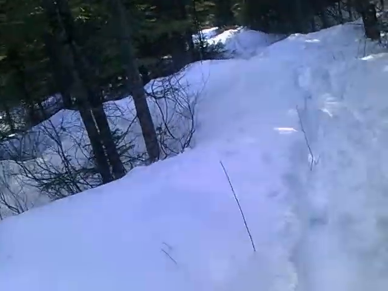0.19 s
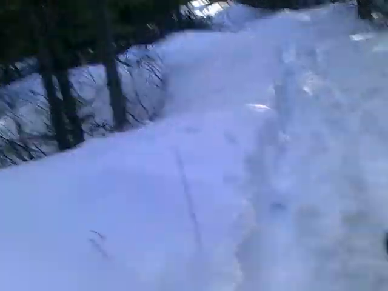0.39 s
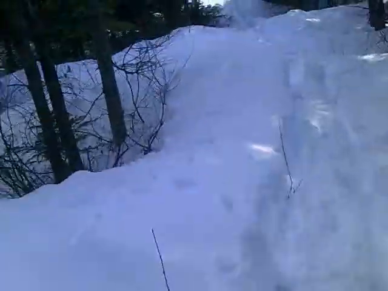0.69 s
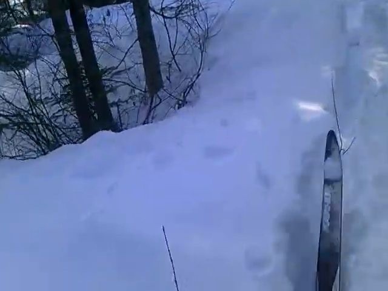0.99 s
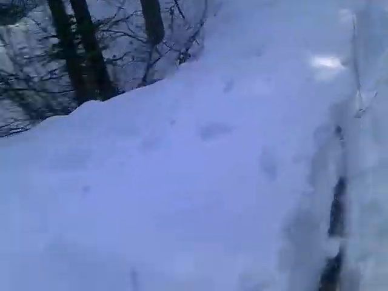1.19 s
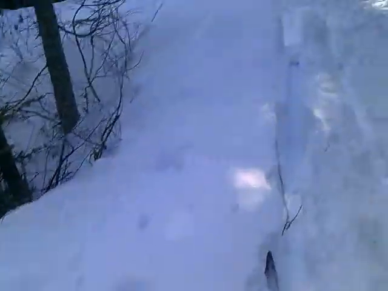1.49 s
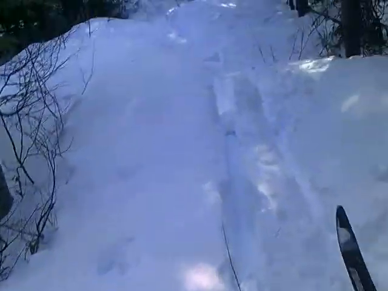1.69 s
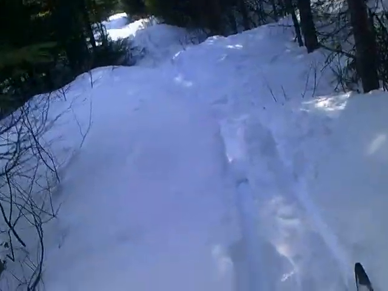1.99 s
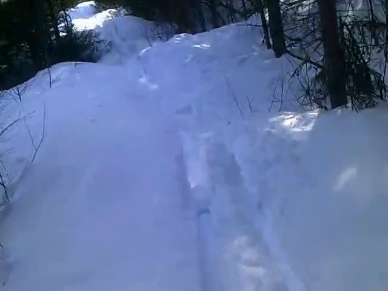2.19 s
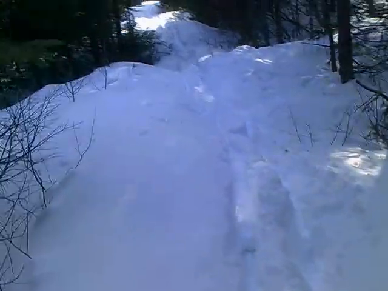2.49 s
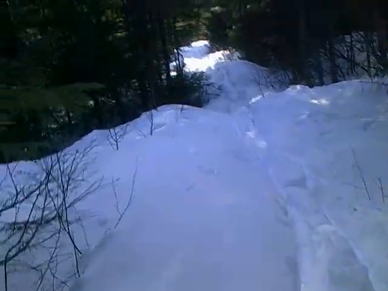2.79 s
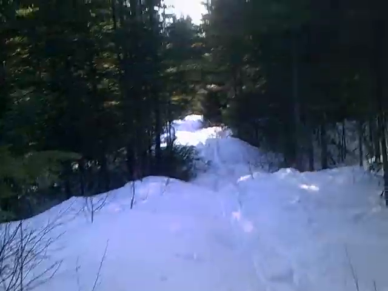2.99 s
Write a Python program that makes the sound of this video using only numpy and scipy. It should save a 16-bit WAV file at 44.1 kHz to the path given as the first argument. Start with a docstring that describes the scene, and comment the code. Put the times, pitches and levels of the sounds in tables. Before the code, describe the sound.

Skis hiss and crunch through soft snow while gear knocks sharply against the microphone.

```python
"""A cross-country trail in soft snow, heard from a small camera on the skier's body.
Skis hiss and snow crunches under skis and poles; gear knocks and rubs on the camera's plastic case.
The strides buffet its dull microphone, which overloads on the hardest knocks."""
import sys
import numpy as np
from scipy import signal
from scipy.fft import rfft, irfft
from scipy.io import wavfile
from scipy.ndimage import uniform_filter1d

SR = 44100
rng = np.random.default_rng(int(sys.argv[2]) if len(sys.argv) > 2 else 0)


def generate_wav(sig):
    """Save sig (samples, or channels by samples) to the path in sys.argv[1] as 16-bit PCM at SR."""
    pcm = np.round(np.clip(np.atleast_2d(sig).T, -1, 1) * 32767).astype(np.int16)
    wavfile.write(sys.argv[1], SR, pcm)


N = 136710

# air and body movement on the microphone: time_s, level_db
BUFFET_LEVELS = [(0, -31), (.15, -41), (.21, -27), (.26, -40.5), (.32, -23.5), (.58, -24), (.66, -43),
                 (.75, -30), (.87, -35.5), (.96, -28), (1.1, -29.5), (1.2, -17.5), (1.5, -35), (1.75, -37),
                 (1.84, -31.5), (1.95, -34), (2.15, -21), (2.32, -26), (2.62, -31), (2.8, -27.5),
                 (3.1, -39.5)]
# buffeting rumble: freq_hz, gain_db
BUFFET_SPECTRUM = [(3, -13.5), (9, 3.5), (18, -7), (80, -22.5), (150, -29), (700, -53), (3000, -84)]
# body bumping the camera: start_s, level_db, pitch_hz
BODY_BUMPS = [(0.303, -19.5, 130), (0.318, -13.5, 170), (0.395, -17, 110), (1.165, -16.5, 173),
              (1.206, -16, 70), (1.22, -19.5, 120), (1.259, -16.5, 140), (1.342, -23.5, 134)]
# hiss of the gliding skis: time_s, level_db
GLIDE_LEVELS = [(0, -42.5), (.13, -43), (.22, -42), (.35, -32.5), (.57, -36), (.63, -47.5), (.68, -44),
                (.73, -38.5), (.9, -40), (1.0, -37.5), (1.26, -37), (1.315, -42.5), (1.38, -37),
                (1.58, -40), (1.79, -39.5), (1.84, -38), (2.08, -41), (2.16, -37.5), (2.34, -40),
                (2.42, -38.5), (2.58, -35), (2.66, -38), (2.74, -36), (2.81, -26.5), (2.87, -35),
                (2.94, -32), (3.1, -39)]
# ski sliding on snow: freq_hz, gain_db
GLIDE_SPECTRUM = [(100, -6), (600, -4), (1150, 0.5), (2000, -11.5), (2700, -16.5), (3500, -25.5),
                  (4500, -35), (7500, -38)]
# snow crushed under a ski or pole: start_s, length_s, level_db
SNOW_CRUNCHES = [(0.341, 0.048, -38), (0.492, 0.086, -40.5), (0.694, 0.043, -43), (0.775, 0.051, -37),
                 (1.143, 0.063, -39.5), (1.415, 0.049, -33), (1.478, 0.084, -44), (1.933, 0.058, -29),
                 (2.1, 0.056, -37.5), (2.204, 0.036, -37), (2.253, 0.03, -39), (2.297, 0.022, -34),
                 (2.556, 0.069, -43.5), (2.675, 0.031, -33)]
# breaking snow crystals: freq_hz, gain_db
CRUNCH_SPECTRUM = [(150, -22.5), (500, 1.5), (1100, 5.5), (1800, -2.5), (2600, -6), (3500, -12.5),
                   (4500, -22), (7500, -23.5)]
# modes of the plastic case: freq_hz, level_db, t60_s
CASE_MODES = [(497, -5, .05), (662, -5, .06), (790, -1, .03), (925, -3, .04), (975, -4, .055),
              (1085, -4, .045), (1250, -10, .03), (1515, -5, .04), (1650, -6, .025), (1890, -6, .024),
              (2100, -9, .02), (2355, -4, .025), (3080, -22, .022), (3355, -19, .02)]
# cloth and strap rubbing the case: start_s, length_s, level_db, tilt_db_per_octave
CLOTH_RUBS = [(-.01, 0.037, -26.5, 3.5), (.347, 0.052, -21.5, -4), (0.433, 0.024, -19, 3),
              (0.46, 0.035, -19, 0.5), (.49, .055, -32, 0), (0.777, 0.05, -38, 4.5),
              (0.936, 0.025, -30.5, 3.5), (1.154, 0.105, -34, -6.5), (1.836, .06, -30, -3.5),
              (1.924, 0.046, -21, -0.5), (2.429, 0.052, -31, 0), (2.528, 0.088, -34, -2)]
# one slip of cloth: freq_hz, gain_db
RUB_SPECTRUM = [(100, -33), (350, -24), (600, 1.5), (950, -9), (1400, -0.5), (2200, -15.5), (2800, -35.5),
                (3600, -28.5), (7500, -40)]
# gear striking the case: start_s, level_db, tilt_db_per_octave, spot_hz, ring_over_crack_db
GEAR_KNOCKS = [(0.0266, -27.5, 2.5, 640, 2), (0.2312, -21, -1, 938, 10), (0.257, -27, -6.5, 887, -9),
               (0.2889, -9.5, 1, 2043, 5), (0.39, -19, 2.5, 1700, -8), (0.3979, -28, 2, 1005, 7),
               (0.4556, -7, 6.5, 500, -6), (0.4606, -11.5, 4.5, 1050, -7.5), (0.4743, -7, -1.5, 710, -4.5),
               (0.4934, -30, 6.5, 990, -8), (0.5073, -26, 4.5, 1100, -18), (.59, -30.5, -1.5, 790, -5),
               (0.688, -40.5, -5, 785, -17), (0.778, -30.5, 4.5, 1600, -4), (0.8222, -27, -8, 500, -12),
               (0.96, -16, 5.5, 1960, 3), (1.17, -25, -6.5, 1164, 5), (1.2574, -11.5, -2.5, 530, -8.5),
               (1.621, -40.5, 5.5, 1200, 9), (1.6721, -32, 1, 890, -5), (1.781, -36.5, -2, 800, -1),
               (1.86, -26.5, 3, 870, 4), (1.9488, -21.5, 4, 722, 0.5), (1.956, -20, 5, 630, 3.5),
               (1.9718, -12.5, -2, 567, 4), (2.1797, -24, 1.5, 1117, -2), (2.2073, -35, 9, 1900, -10),
               (2.2184, -17, 0, 750, -5.5), (2.2298, -23, -2.5, 1890, 12.5), (2.367, -32, 2, 1130, 7),
               (2.467, -26.5, -1.5, 790, -8), (2.522, -31, -6.5, 900, 8), (2.6231, -18, 5.5, 926, 2),
               (2.6944, -22, -1.5, 685, 16), (2.763, -33, 14, 1100, 4), (2.8181, -5.5, 6.5, 1985, 5.5),
               (2.8217, -7.5, -1.4, 843, -1.5), (3.007, -30, -2, 555, -1)]
# dry crack of a contact: freq_hz, gain_db
CRACK_SPECTRUM = [(80, -7), (300, -12), (600, 7.5), (1000, 7.5), (1500, -2.5), (2350, -6.5), (2800, -23.5),
                  (4500, -28.5), (8000, -39.5)]
# microphone and its electronics: freq_hz, gain_db
MIC_RESPONSE = [(1000, 0.5), (3450, -3.5), (4000, -15), (4600, -17), (5050, -31), (5400, -56.5),
                (5900, -21), (7000, -8), (8000, -12), (8600, -58.5), (12000, -80.5)]


def undb(db):
    """Decibels to gain."""
    return 10 ** (np.asarray(db) / 20)


def unit(x):
    """Scale to rms 1."""
    return x / (np.std(x) + 1e-12)


def curve(points):
    """Gain over time from (time_s, level_db) points."""
    return undb(np.interp(np.arange(N) / SR, *np.array(points).T))


def add(out, start_s, x):
    """Mix x into out at start_s."""
    i = int(round(start_s * SR))
    x, i = x[max(-i, 0):], max(i, 0)
    out[i:i + len(x)] += x[:max(N - i, 0)]


def response(spectrum, tilt_db_per_octave=0, size=4096):
    """Minimum-phase impulse response of a spectrum, tilted through the midrange."""
    hz, db = np.array(spectrum, float).T
    bins_hz = np.maximum(np.arange(size // 2 + 1) * SR / size, 1)
    gain_db = np.interp(np.log(bins_hz), np.log(np.sort(hz)), db)
    gain_db += tilt_db_per_octave * np.log2(np.clip(bins_hz, 400, 3000) / 1000)
    cepstrum = irfft(gain_db * np.log(10) / 20)
    cepstrum[1:size // 2] *= 2
    cepstrum[size // 2 + 1:] = 0
    return irfft(np.exp(rfft(cepstrum)))


def through(x, ir):
    """Pass x through an impulse response."""
    return signal.fftconvolve(x, ir)[:len(x)]


def grains(rate_per_s, scatter_db, count=N):
    """Random impulses, most weak, a few strong."""
    occurs = rng.random(count) < rate_per_s / SR
    strength = np.minimum(rng.exponential(size=count), 4)
    return occurs * undb(scatter_db * strength) * rng.choice([-1, 1], count)


def wander(rate_hz):
    """Smooth random drift, spread 1."""
    hold = max(int(SR / rate_hz), 1)
    steps = rng.standard_normal(N)[np.arange(N) // hold]
    return unit(uniform_filter1d(steps, hold))


def stroke(length_s, attack_share=0.24, release_s=0.004, tail_s=0.08):
    """Swell, hold and release of one push."""
    t = np.arange(int((length_s + tail_s) * SR)) / SR
    swell = np.minimum(t / (attack_share * length_s), 1)
    return swell * np.exp(-np.maximum(t - length_s + release_s / 2, 0) / release_s)


def case_ring(tilt_db_per_octave, spot_hz, spot_db=11.5, spot_octaves=0.39):
    """Case modes after one tap; the struck spot favours those near spot_hz."""
    hz, db, t60_s = np.array(CASE_MODES, float).T[:, :, None]
    t = np.arange(4096) / SR
    boost_db = spot_db * np.exp(-(np.log2(hz / spot_hz) / spot_octaves) ** 2)
    gain = undb(db + tilt_db_per_octave * np.log2(hz / 1000) + boost_db)
    sign = (-1) ** np.arange(len(CASE_MODES))[:, None]  # neighbours in antiphase
    decay = np.exp(-np.log(1000) * t / t60_s)
    return unit(np.sum(sign * gain * np.sin(2 * np.pi * hz * t) * decay, axis=0))


def wall_delay(x, centre_hz, width_hz):
    """Allpass: the case wall delays the midrange, spreading a tap over a few cycles."""
    radius = np.exp(-np.pi * width_hz / SR)
    feedback = [1, -2 * radius * np.cos(2 * np.pi * centre_hz / SR), radius * radius]
    return signal.lfilter(feedback[::-1], feedback, x)


def buffeting():
    """Air and body movement rumble on the microphone, swelling with each stride."""
    rumble = through(rng.standard_normal(2 * N), response(BUFFET_SPECTRUM, size=32768))[N:]
    return curve(BUFFET_LEVELS) * unit(rumble)


def body_bumps(rise_cycles=0.22, length_s=0.08):
    """The body bumps the camera: soft, heavily damped low pulses."""
    out = np.zeros(N)
    t = np.arange(int(length_s * SR)) / SR
    for start_s, level_db, pitch_hz in BODY_BUMPS:
        age = pitch_hz * t / rise_cycles
        envelope = age * np.exp(1 - age)
        add(out, start_s, undb(level_db) * envelope * np.sin(2 * np.pi * pitch_hz * t))
    return out


def ski_glide(flutter_db=3, ring_db=-17.5, dull_hz=1300):
    """Grains slide under the skis and faintly ring the case; the hiss brightens under load."""
    ring = undb(ring_db) * case_ring(tilt_db_per_octave=-4.5, spot_hz=1080)
    grain_ir = unit(response(GLIDE_SPECTRUM)) + ring
    scrape = through(grains(rate_per_s=2800, scatter_db=2), grain_ir)
    hiss = unit(scrape * undb(flutter_db * wander(rate_hz=44.53)))  # flutters with the track
    dull = signal.filtfilt(*signal.butter(1, dull_hz, fs=SR), hiss)
    load = curve(GLIDE_LEVELS)
    brightness = (load / np.median(load)) ** 0.32
    return load * (dull + brightness * (hiss - dull))


def snow_crunches():
    """Snow crystals break in short showers under each push."""
    push = np.zeros(N)
    for start_s, length_s, level_db in SNOW_CRUNCHES:
        add(push, start_s, undb(level_db) * stroke(length_s))
    fractures = grains(rate_per_s=1300, scatter_db=3)
    return push * unit(through(fractures, response(CRUNCH_SPECTRUM)))


def cloth_rubs(ring_db=3):
    """Cloth sticks and slips on the case: dense ticks drive its modes."""
    out = np.zeros(N)
    for start_s, length_s, level_db, tilt_db_per_octave in CLOTH_RUBS:
        slips = grains(rate_per_s=1900, scatter_db=3.5, count=16384)
        ring = undb(ring_db) * case_ring(tilt_db_per_octave, spot_hz=995)
        slip_ir = unit(response(RUB_SPECTRUM, tilt_db_per_octave)) + ring
        envelope = stroke(length_s)
        friction = unit(through(slips, slip_ir)[-len(envelope):])
        add(out, start_s, undb(level_db) * envelope * friction)
    return out


def gear_knocks(blow_s=0.01):
    """Gear strikes the case: a dry crack and a short ring."""
    out = np.zeros(N)
    for start_s, level_db, tilt_db_per_octave, spot_hz, ring_over_crack_db in GEAR_KNOCKS:
        crack = unit(response(CRACK_SPECTRUM, tilt_db_per_octave))
        ring = undb(ring_over_crack_db) * case_ring(tilt_db_per_octave, spot_hz)
        hit = wall_delay(crack, centre_hz=1040, width_hz=930) + ring
        hit *= np.sqrt(blow_s * SR / np.sum(hit ** 2))  # energy of rms 1 over blow_s
        add(out, start_s, undb(level_db) * hit)
    return out


def scene():
    """All sources at one microphone."""
    return (gear_knocks() + cloth_rubs() + snow_crunches() + ski_glide() + body_bumps() + buffeting())[None]


def record(dry):
    """The microphone overloads on the hardest knocks; the electronics dull, clip and band-limit."""
    overload_at, top_hz = 0.91, 16500
    overloaded = np.clip(dry[0], -overload_at, overload_at)
    dulled = through(overloaded, response(MIC_RESPONSE))
    lowpass = signal.ellip(8, .2, 70, top_hz, fs=SR, output="sos")
    return signal.sosfilt(lowpass, np.clip(dulled, -1, 1))[None]


dry = scene()
out = record(dry)
generate_wav(out)
```